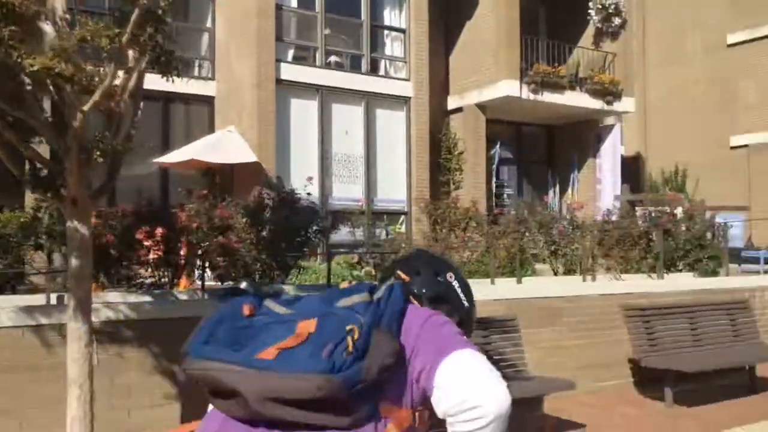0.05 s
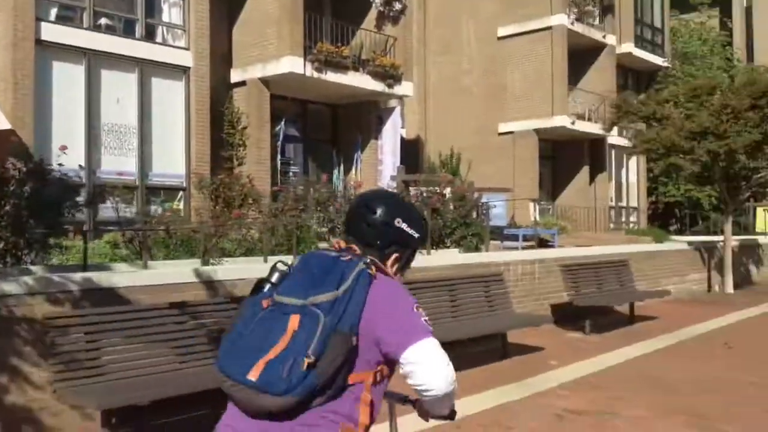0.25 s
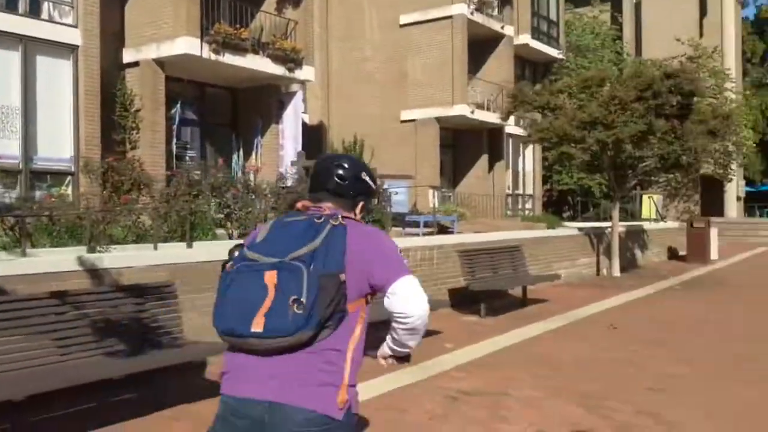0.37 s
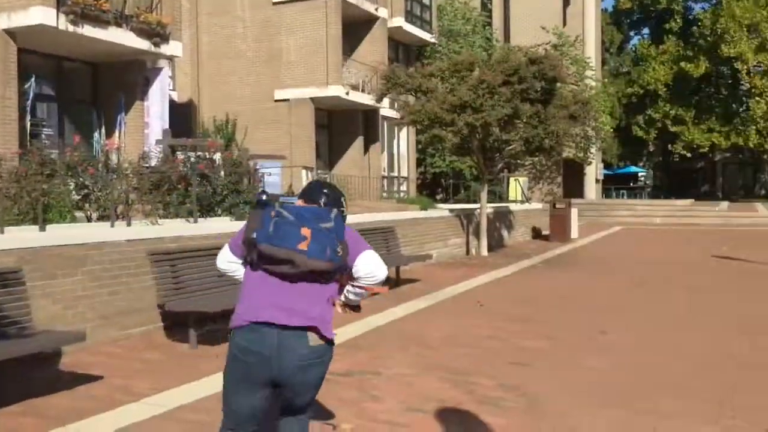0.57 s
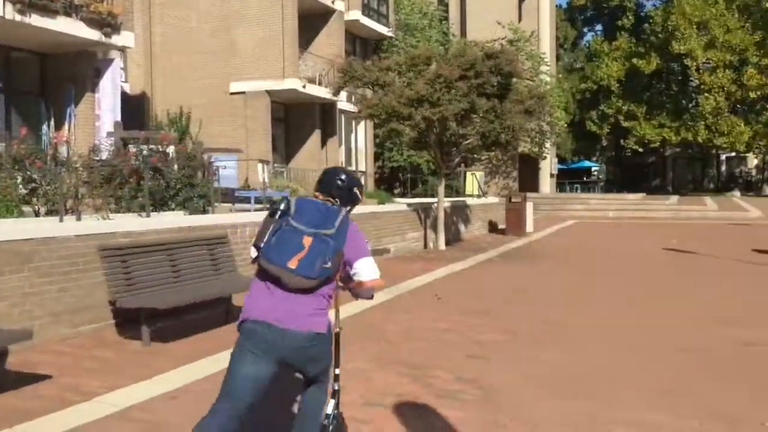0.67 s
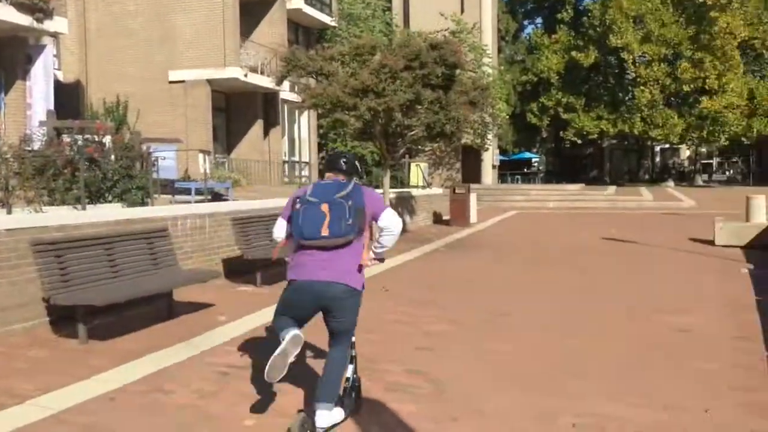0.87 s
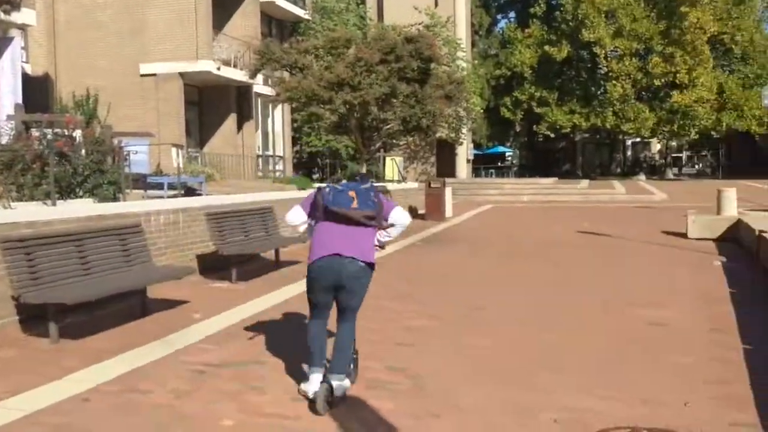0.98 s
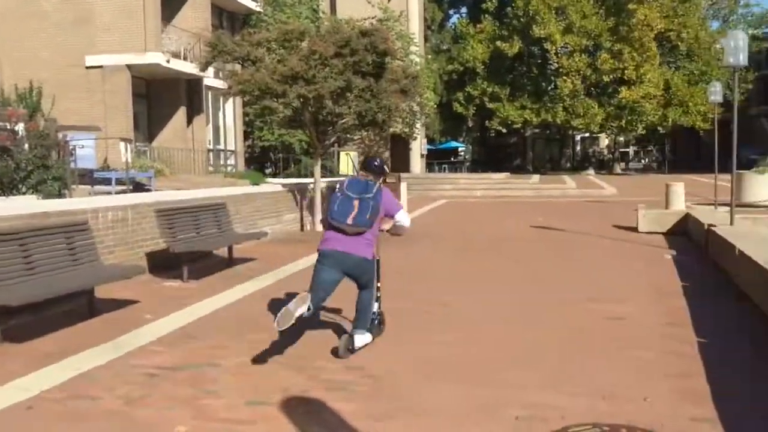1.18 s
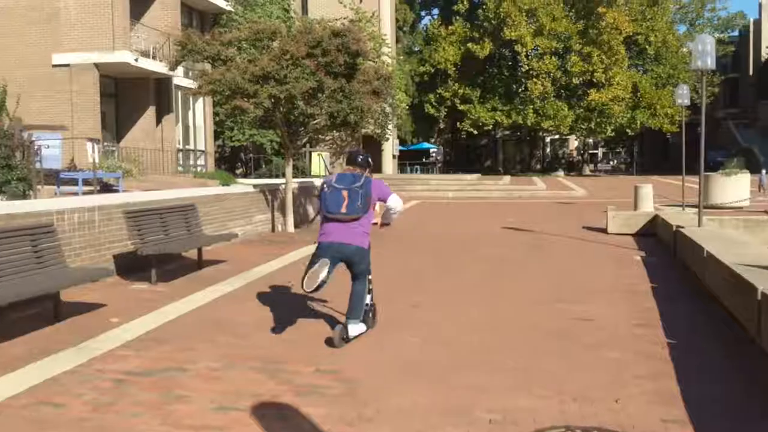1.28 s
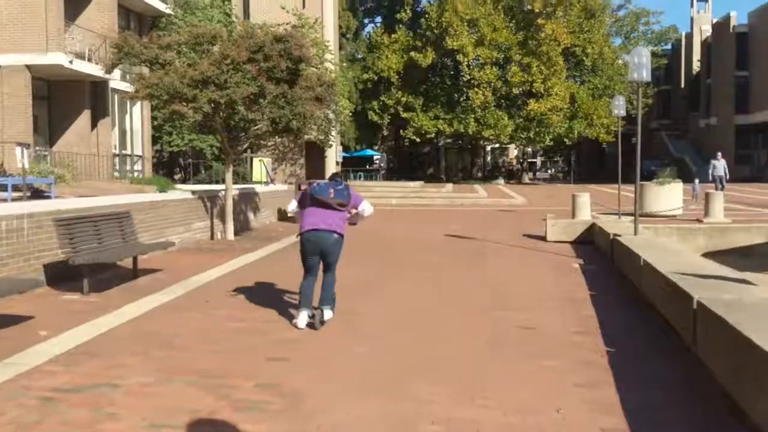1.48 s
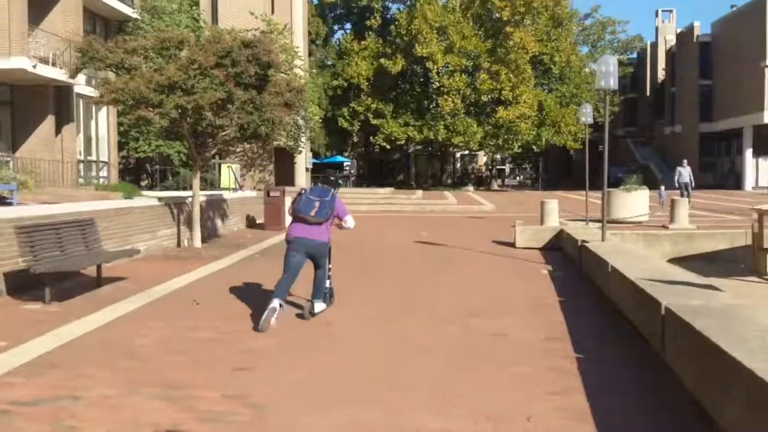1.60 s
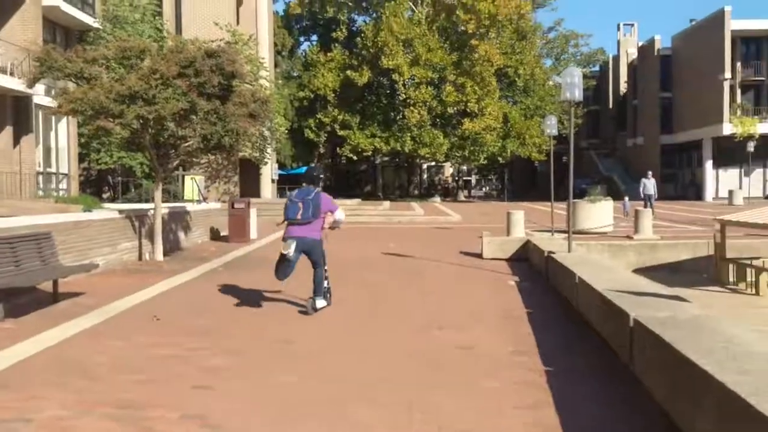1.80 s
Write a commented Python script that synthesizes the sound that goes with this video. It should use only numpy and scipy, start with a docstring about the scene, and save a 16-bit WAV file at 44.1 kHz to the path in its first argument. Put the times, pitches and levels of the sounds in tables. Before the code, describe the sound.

Kick scooter wheels rumble on bricks outdoors, with four pushing footfalls and a brief metal rattle.

```python
"""A brick plaza, with a kick scooter rolling away across it. The wheels rumble on the rough paving,
tick over the joints and thump into the wider ones, and the deck drones. Four times the rider's shoe
slaps down, heel then sole, and scuffs off over grit; once a loose metal part rattles.
The house fronts return a thin echo of the shoe, the rattle and the bumps."""
import sys
import numpy as np
from scipy import signal
from scipy.fft import rfft, irfft
from scipy.io import wavfile
from scipy.ndimage import uniform_filter1d

SR = 44100
rng = np.random.default_rng(int(sys.argv[2]) if len(sys.argv) > 2 else 0)


def generate_wav(signal):
    """Clip the signal to [-1, 1] and save it as 16-bit WAV at the path in sys.argv[1]."""
    frames = np.transpose(np.atleast_2d(signal))
    scaled = np.clip(frames, -1, 1) * 32767
    pcm = np.round(scaled).astype(np.int16)
    wavfile.write(sys.argv[1], SR, pcm)


N = 81585

# Tone of the wheel rumble, the joint ticks and the echo. Each row: frequency in Hz, relative level in dB.
RUMBLE_EQ = [(25, -39), (45, -8), (70, -3), (115, -2), (220, -0.5), (320, -8.5), (600, -11), (1000, -14),
             (2000, -22.5), (4000, -26), (6700, -32), (8000, -40.5), (10500, -40), (16000, -48.5)]
JOINT_EQ = [(100, -0.5), (500, 7), (1100, -2.5), (2200, -4), (5000, -16.5), (14000, -37.5)]
ECHO_EQ = [(80, -10), (250, -2.5), (600, -0.5), (2000, -0.5), (5000, 2.5), (14000, -3.5)]
# Fader rides for the rumble and the deck's drone. Each row: time in seconds, level in dB.
RUMBLE_RIDE = [(0, -42.5), (.2, -41), (.45, -41.5), (.9, -44), (1.25, -39.5), (1.45, -44), (1.85, -42)]
DRONE_RIDE = [(0, -65), (.25, -39.5), (.42, -46.5), (.8, -41), (1.2, -49.5), (1.5, -60), (1.65, -51),
              (1.82, -39.5)]
# Resonances of the scooter's deck, wheel, frame and loose metal part.
# Each row: frequency in Hz, relative level in dB, time to die away by 60 dB (t60) in seconds.
DECK_MODES = [(147, 5.5, 0.56), (210, -10, .14)]
WHEEL_MODES = [(83, -2, .09)]
FRAME_MODES = [(364, -12.5, 0.055), (486, -7, 0.077), (646, -6.5, 0.053), (1003, -6.5, 0.047),
               (1310, -21, 0.039), (2240, -7, 0.011)]
METAL_MODES = [(2330, 7, 0.37), (2470, -9, .12), (2670, -9, 0.11), (3780, -13, 0.11), (6560, 2.5, .21),
               (6600, 1, .22), (8200, -12, .12), (9738, -6, 0.13)]
# A wheel drops into a wider joint. Each row: start in seconds, thump level in dB, clack level in dB.
BUMP_CUES = [(.015, -29, -40), (0.495, -41, -30.5), (1.247, -54, -30), (1.276, -50, -34)]
# Bounces of the loose part. Each row: start in seconds, relative level in dB.
RATTLE_CUES = [(.9915, -5), (.9982, -3), (1.0048, -2.5), (1.0105, -9), (1.0175, -9), (1.0305, -12),
               (1.063, -13.5)]
# Tone of the metal's tick, the grit's grind and its sandy hiss.
# Each row: frequency in Hz, relative level in dB.
TICK_EQ = [(1000, -16), (2400, 8), (4800, -3.5), (7000, 7.5), (10000, -4), (12500, -11), (16000, -28)]
GRIND_EQ = [(100, -2.5), (300, -4.5), (550, 3.5), (950, -2.5), (1200, 0.5), (1450, 1), (1950, -2),
            (2700, -9), (3500, -3), (5000, -16), (7000, -23), (16000, -31)]
SAND_EQ = [(500, -42), (2500, -5.5), (4500, 4), (6500, 2.5), (8000, -8), (11000, -11), (16000, -32)]
# Slips of the sole over grit. Each row: start, rise and t60 in seconds, then the levels of grind,
# sandy hiss and rubber chirp in dB.
SLIP_CUES = [(0.239, 0.0019, 0.036, -27.5, -33.5, -44), (0.252, 0.0015, 0.056, -32, -62, -25),
             (0.282, 0.0059, 0.11, -26, -35, -34), (.296, 0.0038, 0.12, -26, -44, -31),
             (0.314, 0.0052, 0.053, -28.5, -30.5, -31), (0.337, 0.0049, 0.097, -29.5, -42.5, -47),
             (.363, 0.0043, 0.13, -34.5, -49, -28), (0.685, 0.0026, 0.057, -37, -39, -34.5),
             (.702, 0.0046, 0.24, -33, -48, -38), (.770, 0.011, 0.12, -40.5, -43.5, -57),
             (1.143, 0.002, 0.13, -38.5, -89, -60), (1.177, .004, 0.064, -41.5, -64, -64),
             (1.224, 0.00045, 0.071, -35, -40.5, -61), (1.232, 0.007, 0.047, -42, -45.5, -63),
             (1.618, 0.0011, 0.12, -41.5, -53, -56), (1.701, 0.016, 0.13, -43, -47.5, -75)]
# Resonances of the rubber sole, then of a footfall from low to high.
# Each row: frequency in Hz, relative level in dB, t60 in seconds.
SOLE_MODES = [(1954, 5, 0.016), (1618, -4.5, 0.047), (3480, -9, 0.025)]
THUD_MODES = [(208, 0.5, 0.032)]
KNOCK_MODES = [(411.5, -1.5, 0.02), (555.6, -0.5, 0.027)]
SLAP_MODES = [(957, -3.5, 0.018), (1350, -5.5, 0.0083), (1887, 0.5, 0.016), (2130, -9.5, 0.0057),
              (2570, -13, 0.019), (3242, -6.5, 0.014), (3570, -16.5, 0.0076), (4855, -14.5, 0.0084),
              (6430, -17.5, 0.01)]
# Tone of a footfall's crack and sharp snap. Each row: frequency in Hz, relative level in dB.
CRACK_EQ = [(150, -12), (600, 8.5), (1100, 0.5), (1800, 4.5), (3500, 1), (5200, -6), (6800, -11),
            (8000, -30), (16000, -38.5)]
SNAP_EQ = [(300, 6), (3000, 6), (5500, -12), (8500, -9), (12500, -25), (16000, -25)]
# Shoe meets brick. Each row: start in seconds, levels of thud, knock, slap, crack and snap in dB,
# pitch factor of thud and knock, pitch factor of the slap, tilt of the slap in dB per octave.
SHOE_CUES = [(0.2091, -9, -9.5, -12, -14, -4, 1.01, 0.91, -1),
             (0.2201, -15, -19, -23, -23, -42, 1.05, 1.04, -7),
             (0.227, -17, -23, -23, -19, -34, 1.15, 1.12, -2),
             (0.6554, -13.5, -3, -9.5, -14.5, -40, 1.005, 1.08, 1),
             (0.669, -32, -25, -31, -19.5, -26, 1.32, 1.25, -2),
             (1.1150, -25, -26, -23.5, -27.5, -45, 0.98, 1.05, 2),
             (1.1260, -33, -21, -26.5, -33, -55, .95, 0.747, -4),
             (1.1300, -28, -33, -29, -38, -57, 1.04, .78, -5),
             (1.5777, -21.5, -24, -22.5, -26, -53, 1.02, 0.92, -5.5),
             (1.5873, -25, -23, -21, -33, -58, 1.04, 0.84, 1.5)]

JOINT_DB, METAL_DB, TICK_DB, ECHO_DB, CRUNCH_DB = -54.5, -49.5, -27.5, -15, -12
FLUTTER_DB, SLAP_PIVOT_HZ, ECHO_BUILD_S = 1.5, 1850, 0.014
DRONE_EVENNESS, DRONE_SWELL_S = 0.76, 0.04  # how far swells are evened out (0-1), and over what time
LOW_CUT_HZ, HIGH_CUT_HZ = 72, 15900


def undb(db):
    """Decibels to gain."""
    return 10 ** (np.asarray(db) / 20)


def unit(x):
    """Scale to rms 1."""
    return x / np.sqrt(np.mean(x ** 2))


def clock():
    """Time of each sample in seconds."""
    return np.arange(N) / SR


def fade(t60):
    """Exponential decay, 60 dB down after t60 seconds."""
    return np.exp(-np.log(1000) * clock() / t60)


def through(x, response):
    """Play a sound through an impulse response."""
    return signal.fftconvolve(x, response)[:N]


def at(start, x):
    """Delay a sound to its start in seconds."""
    return np.concatenate([np.zeros(int(start * SR)), x])[:N]


def colour(x, eq):
    """Minimum-phase EQ of unit energy through (Hz, dB) points."""
    hz, db = np.array(eq, float).T
    grid_hz = np.arange(2049) * SR / 4096 + 1
    gain = undb(np.interp(np.log(grid_hz), np.log(hz), db))
    cepstrum = irfft(np.log(gain))
    causal = np.r_[cepstrum[0], 2 * cepstrum[1:2048], np.zeros(2048)]
    response = irfft(np.exp(rfft(causal)))
    return through(x, response / np.linalg.norm(response))


def ring(modes, pitch=1):
    """A struck body: damped sines of alternating sign."""
    return sum((-1) ** k * undb(db) * fade(t60) * np.sin(2 * np.pi * hz * pitch * clock())
               for k, (hz, db, t60) in enumerate(modes))


def noise():
    """White noise."""
    return rng.standard_normal(N)


def grains(per_s, spread_db):
    """Random clicks of uneven size."""
    size = undb(spread_db * np.minimum(rng.exponential(size=N), 4))
    return unit((rng.random(N) < per_s / SR) * size * np.sign(noise()))


def wander(hz):
    """Smooth random drift of rms 1."""
    width = int(SR / hz)
    return unit(uniform_filter1d(uniform_filter1d(noise(), width), width))


def ride(points):
    """Gain along (seconds, dB) points."""
    return undb(np.interp(clock(), *np.array(points).T))


def plaza_echo(x):
    """Add the scattered reflections from benches, walls and house fronts."""
    build = np.minimum(clock() / ECHO_BUILD_S, 1)
    tail = colour(grains(per_s=2500, spread_db=6) * fade(t60=0.63) * build, ECHO_EQ)
    return x + undb(ECHO_DB) * through(x, tail / np.linalg.norm(tail))


def wheels():
    """The bed: rough brick makes the wheels rumble and the deck drone; the joints tick faintly."""
    rumble = colour(noise(), RUMBLE_EQ) * ride(RUMBLE_RIDE) * undb(FLUTTER_DB * wander(hz=30.6))
    deck = unit(irfft(rfft(noise()) * rfft(ring(DECK_MODES)), N))
    swell = np.sqrt(uniform_filter1d(deck ** 2, int(DRONE_SWELL_S * SR)))
    drone = unit(deck / swell ** DRONE_EVENNESS) * ride(DRONE_RIDE)
    ticks = through(grains(per_s=55, spread_db=2.5), noise() * fade(t60=0.011))
    return rumble + drone + undb(JOINT_DB) * unit(colour(ticks, JOINT_EQ))


def bumps():
    """Wider joints thump the wheels and clack the frame."""
    thump, clack = ring(WHEEL_MODES), ring(FRAME_MODES)
    return sum(at(start, undb(thump_db) * thump + undb(clack_db) * clack)
               for start, thump_db, clack_db in BUMP_CUES)


def rattle():
    """A loose metal part bounces, each hit a bright tick with a thin ring."""
    metal = undb(METAL_DB) * ring(METAL_MODES)
    track = 0
    for start, db in RATTLE_CUES:
        tick = undb(TICK_DB) * colour(noise() * fade(t60=0.013), TICK_EQ)
        track += undb(db) * at(start, metal + tick)
    return track


def scuffs():
    """Grit grinds and hisses under the sole in short slips as the foot pushes off; the rubber chirps."""
    grind, sand, rubber = 0, 0, 0
    for start, rise, t60, grind_db, sand_db, chirp_db in SLIP_CUES:
        age = clock() - start
        slip = np.clip(age / rise, 0, 1) * np.exp(-np.log(1000) * np.maximum(age - rise, 0) / t60)
        grind += undb(grind_db) * slip
        sand += undb(sand_db) * slip
        rubber += undb(chirp_db) * slip
    grit = lambda: grains(per_s=2200, spread_db=2)
    scrape = colour(grind * grit(), GRIND_EQ) + colour(sand * grit(), SAND_EQ)
    sole = ring(SOLE_MODES)
    return scrape + through(rubber * grit(), sole / np.linalg.norm(sole))


def footfalls():
    """Shoe hits brick: a thud, a hollow knock, a slap and a crunchy crack; a hard landing snaps."""
    track = 0
    for start, thud_db, knock_db, slap_db, crack_db, snap_db, pitch, slap_pitch, tilt in SHOE_CUES:
        body = undb(thud_db) * ring(THUD_MODES, pitch) - undb(knock_db) * ring(KNOCK_MODES, pitch)
        tilted_modes = [(hz, slap_db + db + tilt * np.log2(hz / SLAP_PIVOT_HZ), t60)
                        for hz, db, t60 in SLAP_MODES]
        slap = ring(tilted_modes, slap_pitch)
        crunch_tail = undb(CRUNCH_DB) * fade(t60=0.075)
        crack = undb(crack_db) * colour(noise() * (fade(t60=0.018) + crunch_tail), CRACK_EQ)
        snap = undb(snap_db) * colour(noise() * fade(t60=0.0018), SNAP_EQ)
        track += at(start, body - slap + crack + snap)
    return track


def scene():
    """Mono mix: shoe, rattle and bumps echo around the plaza over the dry bed of the wheels."""
    hits = footfalls() + scuffs() + rattle() + bumps()
    return (plaza_echo(hits) + wheels())[None]


def record(dry):
    """The microphone drops the deep bass, rounds the loudest peaks and cuts the top."""
    low_cut = signal.butter(2, LOW_CUT_HZ, "high", fs=SR, output="sos")
    high_cut = signal.ellip(8, .2, 70, HIGH_CUT_HZ, fs=SR, output="sos")
    rounded = np.tanh(signal.sosfilt(low_cut, dry))
    return signal.sosfilt(high_cut, rounded)


dry = scene()
out = record(dry)
generate_wav(out)
```